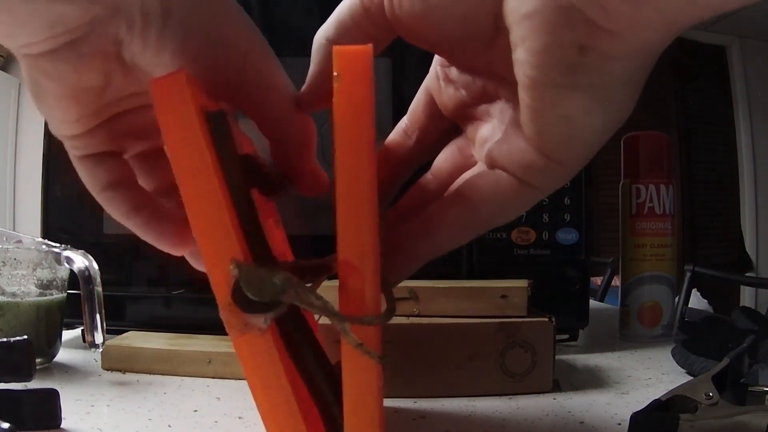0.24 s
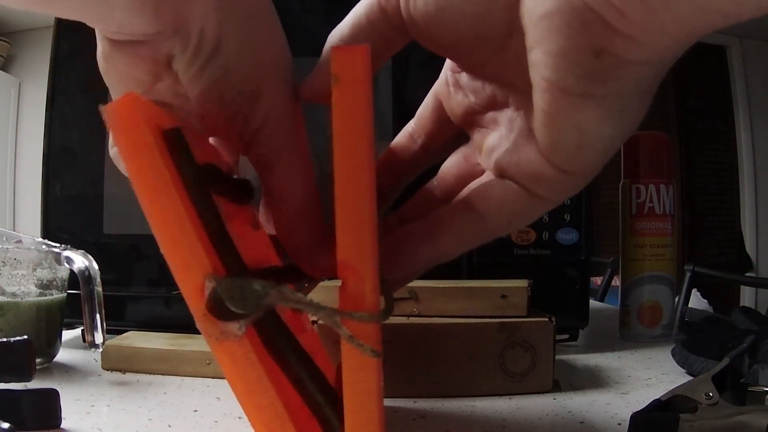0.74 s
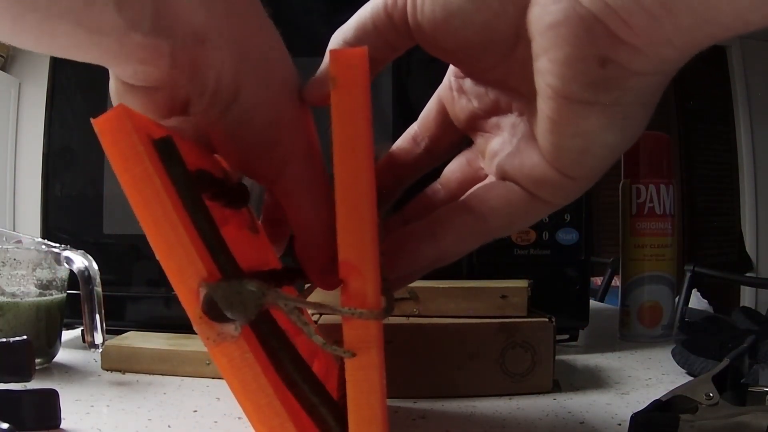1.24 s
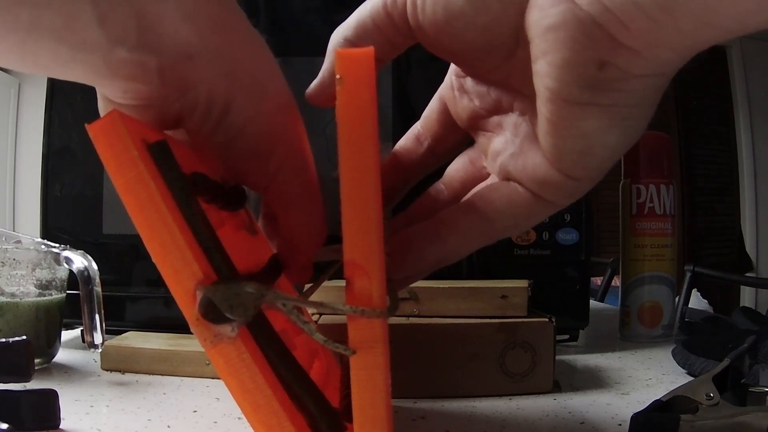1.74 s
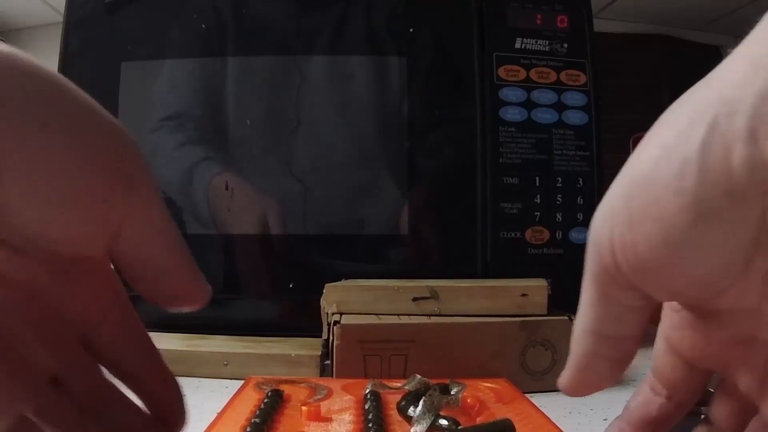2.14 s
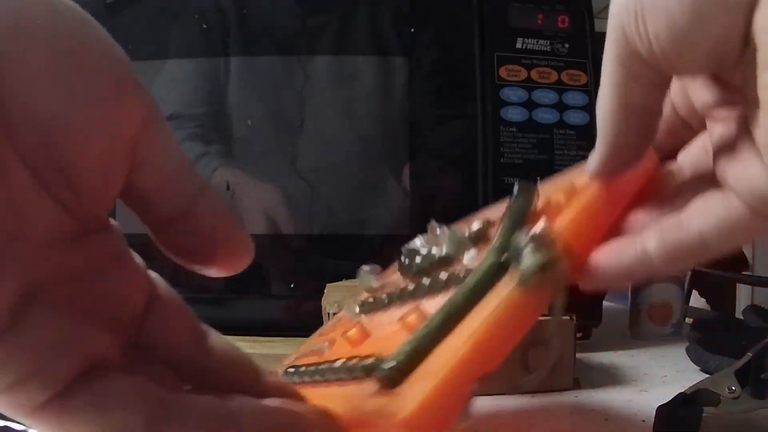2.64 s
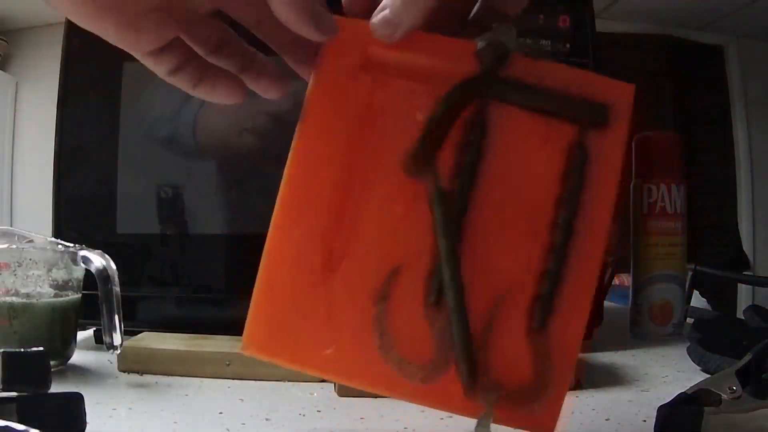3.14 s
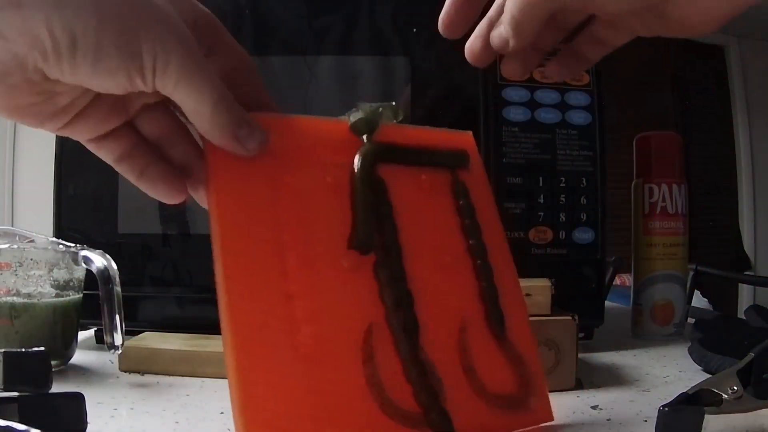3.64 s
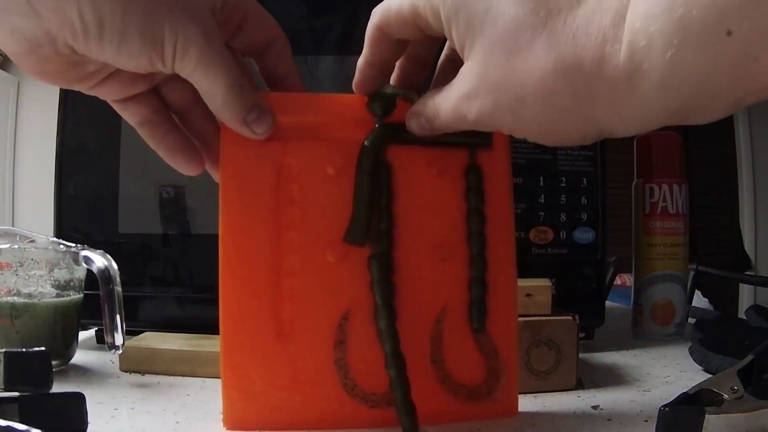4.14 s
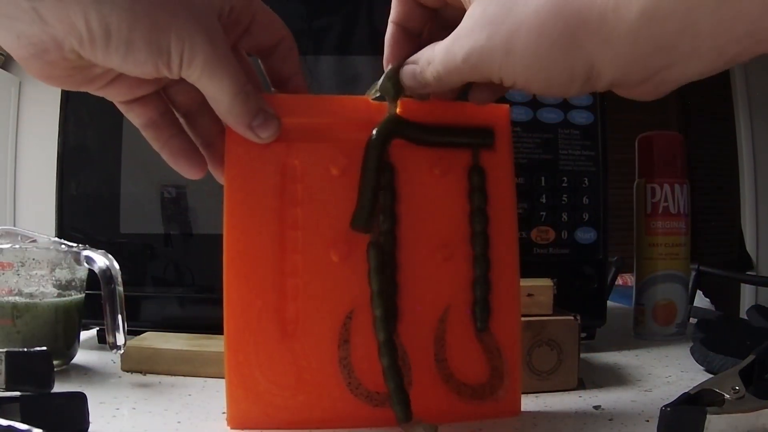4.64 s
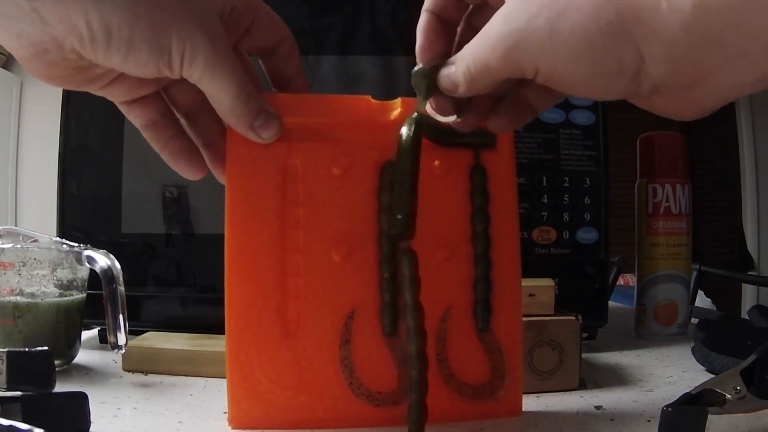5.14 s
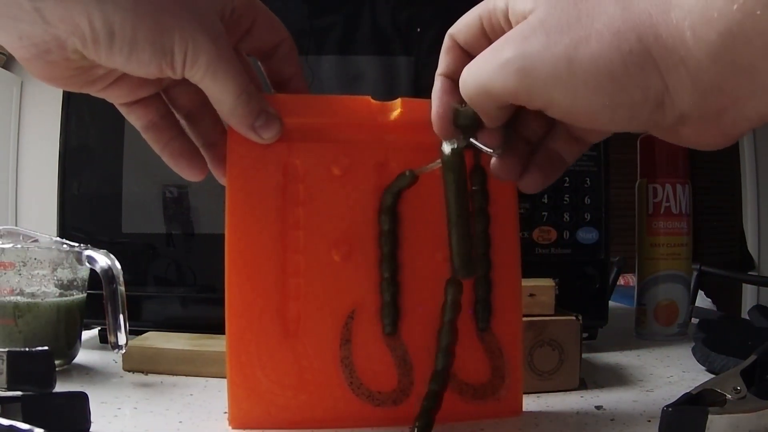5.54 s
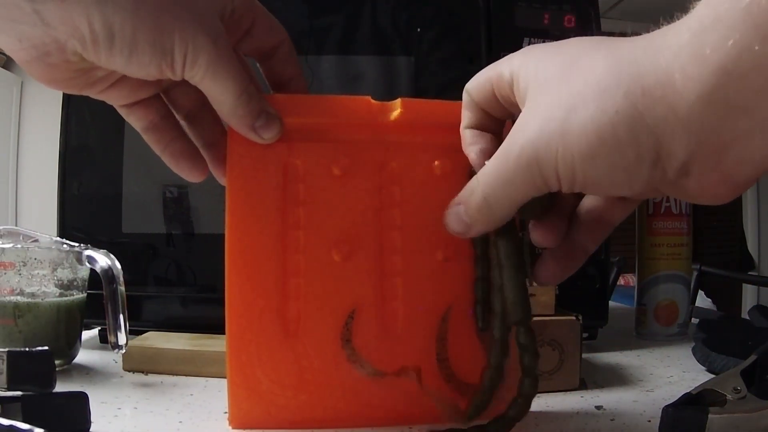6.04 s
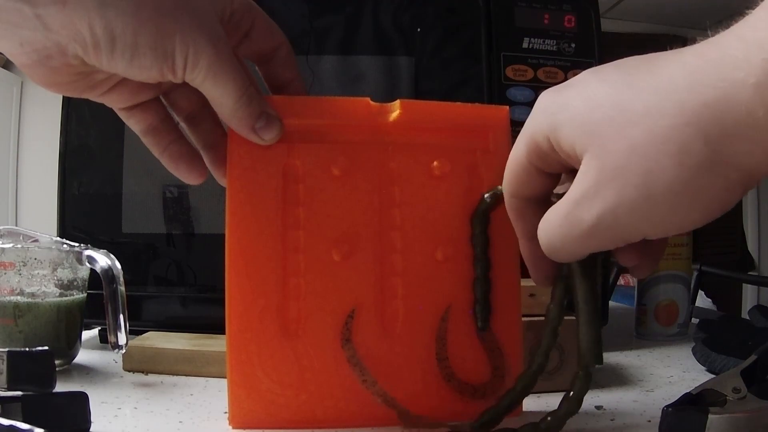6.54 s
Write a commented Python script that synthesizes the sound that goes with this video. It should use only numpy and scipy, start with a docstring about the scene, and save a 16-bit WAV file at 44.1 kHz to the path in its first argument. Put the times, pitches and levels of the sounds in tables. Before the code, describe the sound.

Close, dry-sounding kitchen handling of a stiff plastic plate. Muffled finger bumps and one solid clustered knock come first, followed by a pause with only quiet room hiss and a low appliance hum. Later the plate slides lightly, rattles and stutters against the counter in quick clacks, then gives separate snaps, skin rubs and faint sticky peeling, ending with a heavy dull thud and a firm knock.

```python
"""Two hard plastic mold halves knock and snap as they are pried apart on a kitchen counter, heard close up.
Each contact is a damped push, a noisy snap and ringing plate modes, balanced in four frequency registers.
A half stood upright scrapes and judders: random slips ring narrow resonances. Fingers rub and peel out soft
lures, and the counter rumbles low, all from shaped noise and slips. Short noise echoes form the small room,
over steady hiss and a slightly unsteady hum of sines."""
import sys
import numpy as np
from scipy import signal
from scipy.fft import rfft, irfft, next_fast_len
from scipy.io import wavfile

SR = 44100
rng = np.random.default_rng(int(sys.argv[2]) if len(sys.argv) > 2 else 0)


def generate_wav(sig):
    """Save sig (samples, or channels by samples) to the path in sys.argv[1] as 16-bit PCM at SR."""
    pcm = np.round(np.clip(np.atleast_2d(sig).T, -1, 1) * 32767).astype(np.int16)
    wavfile.write(sys.argv[1], SR, pcm)


N = 299439

# Room air and hiss, relative spectrum: (frequency [Hz], density [dB per Hz])
AIR_SPECTRUM = [(12, -59), (20, 0.5), (32, -34.5), (47, -4), (70, -2.5), (85, -7.5), (119, -2), (208, -3),
                (246, -8), (268, -8.5), (407, -10.5), (508, -15), (913, -19), (1140, -21), (15700, -29.5)]
# Hum partials, before the hum trim: (frequency [Hz], level [dB])
HUM_PARTIALS = [(59.2, -82.5), (118.4, -81.5), (242.2, -81), (597.5, -90.5), (721.4, -100.5),
                (780.6, -90.5), (899.0, -91.5), (1082, -95.5), (1319, -95)]
# Decay of the small room: (frequency [Hz], T60 [s])
ROOM_DECAY = [(100, 0.92), (350, 0.29), (1000, 0.26), (4000, 0.2), (10000, 0.24)]

# Relative noise colours of counter rumble, skin, tacky lures, gritty edge and plastic snap:
# (frequency [Hz], density [dB per Hz])
COUNTER_SPECTRUM = [(35, -11), (65, -3.5), (88, 6.5), (130, -4), (220, -19.5), (500, -53)]
SKIN_SPECTRUM = [(100, -37), (220, 1), (350, 14), (480, -3.5), (700, -22), (1500, -27), (4000, -68)]
TACK_SPECTRUM = [(600, -6), (1500, -2), (2300, -33), (3300, -9.5), (4400, -3), (5400, -5), (6800, -31),
                 (10000, -44)]
GRIT_SPECTRUM = [(70, -29), (150, -16), (350, -28), (700, -6), (1100, 8.5), (1900, 2.5), (3300, -17),
                 (5500, -10), (9000, -25), (15000, -42)]
SNAP_SPECTRUM = [(100, 2.5), (700, 8), (1300, 3.5), (1900, -4.5), (3200, -5.5), (4000, -12), (5000, -7.5),
                 (6500, -23), (8300, -29), (10000, -37), (15000, -33)]

# Resonances rung by friction, relative levels: (frequency [Hz], width [Hz], level [dB])
PEEL_RESONANCES = [(2140, 340, 3), (3360, 68, -9), (4070, 140, -4), (4390, 99, 12), (4900, 210, -4)]
SLIDE_RESONANCES = [(573, 160, 9), (990, 38, -33), (1360, 75, -24), (2530, 55, -3), (2960, 230, -8),
                    (3860, 130, -14), (5000, 65, -4.5)]
JUDDER_RESONANCES = [(397, 42, -8.5), (702, 29, 5), (1034, 39, -2.5), (1436, 59, -6), (2420, 63, -17.5),
                     (2800, 59, -14), (3520, 200, -19.5), (4500, 230, -31)]

# Strokes, levels before each layer's trim: (start [s], length [s], level [dB], change over the stroke [dB])
# Low counter rumbles, some trailing a hard knock
RUMBLE_STROKES = [(4.825, 0.042, -40, -7), (4.94, 0.18, -65, -12), (5.36, 0.14, -47.5, -8.5),
                  (6.385, 0.048, -51, -7)]
# Fingers rubbing on the plate
RUB_STROKES = [(1.14, 0.12, -59.5, 4), (1.33, 0.048, -49, -20), (2.135, 0.1, -64, -10),
               (3.28, 0.11, -54, -4), (5.31, 0.063, -62.5, 7), (5.66, 0.078, -53, -8),
               (6.44, 0.35, -61.5, -2.5)]
# Tacky lures peeling from their cavities
PEEL_STROKES = [(1.08, 0.052, -53, -22), (2.135, 0.072, -75, -9), (5.335, 0.033, -72.5, -2),
                (5.47, 0.18, -66, -7.5), (5.63, 0.07, -54.5, -9.5), (5.75, 0.173, -77, 7.5),
                (6.538, 0.021, -65, -3.5)]
# The plate sliding upright over the counter
SLIDE_STROKES = [(3.12, 0.187, -72, 9), (3.32, 0.095, -61, -4.5), (5.645, 0.14, -61, -13)]
# Its edge juddering on the counter as the lures are tugged
JUDDER_STROKES = [(4.28, 0.18, -55, 1), (4.435, 0.043, -43.5, -8), (4.505, 0.16, -48, -14),
                  (4.71, 0.043, -64, -3)]

# Plate modes, levels before register balance:
# (frequency [Hz], T60 [s], level struck at the edge [dB], level struck at a corner [dB])
PLATE_MODES = [(95.8, 0.22, -17, -7), (159.7, 0.14, -7.5, -2.5), (240.6, .17, -12.5, -15.5),
               (336, 0.15, -10.5, -2.5), (382.2, 0.1, 0.5, -3.5), (560.6, 0.087, -6, -1.5),
               (706.7, 0.09, 1.5, -11), (895, 0.054, -6.5, -18), (1105, 0.076, 4.5, -32),
               (1266, 0.065, -7, -7.5), (1523, 0.045, -35, 12.5), (1930, 0.15, -15, -20.5),
               (2230, 0.051, -3.5, -26), (2523, 0.053, -36, -6.5), (2793, 0.044, -22, -29),
               (3086, 0.022, -5, -28), (3300, 0.028, -16, -17), (4780, 0.031, -15, -14),
               (5160, 0.015, -27, -16), (8080, 0.017, -31, -9.5)]
# What the small plate can radiate: (frequency [Hz], gain [dB])
RADIATION_GAIN = [(20, -30), (45, -12), (75, -7), (120, -1), (9000, -2), (11000, -8), (15000, -11)]
# Soft, slowly swelling bumps: fingertips, or the lead-in and after-knock of a dull knock.
# Before radiation: (time [s], push pitch [Hz], level [dB])
SOFT_BUMPS = [(0.456, 246, -59.5), (0.472, 342, -58), (0.542, 302, -57), (0.59, 300, -49),
              (0.612, 350, -50.5), (1.058, 333, -40), (1.069, 340, -32.5), (1.081, 407, -33),
              (1.252, 363, -51.5), (1.331, 323, -46), (6.363, 256, -58.5), (6.389, 338, -39)]
# Plastic knocking on plastic or on the counter, before radiation: (time [s], push pitch [Hz], level [dB],
# hardness [0-1], grip of the hand [0-1], place on the plate [0 edge - 1 corner])
PLASTIC_KNOCKS = [(0.623, 345, -44, 0.31, 1, 0.15), (1.066, 335, -41.5, 0.55, 0.63, 0.67),
                  (1.0764, 255, -34, 0.45, 0.82, 0.56), (1.096, 253, -36.5, .25, 0.49, .15),
                  (2.133, 383, -61.5, 0.6, 1, 0.89), (3.2, 510, -61, 0.43, 0.56, .2),
                  (3.318, 410, -57, 0.64, .95, 0.37), (3.371, 305, -57, 0.5, 1, 0.87),
                  (3.409, 474, -56.5, .4, .5, 0.58), (4.028, 485, -39.5, 0.99, .75, 0.0091),
                  (4.05, 320, -42.5, 0.79, 0.74, 0.68), (4.228, 392, -51.5, 0.81, .6, 0.23),
                  (4.241, 290, -37, 0.75, 0.96, 0.14), (4.27, 374, -45, 0.63, 0.77, 0.34),
                  (4.347, 297, -34, 0.33, 0.44, 0.45), (4.364, 333, -40.5, 0.12, .8, 0.95),
                  (4.398, 368, -47, 0.52, 0.11, 0.11), (4.431, 507, -39, .52, 0.7, 0.99),
                  (4.4372, 525, -32, 0.2, 0.05, 0.49), (4.476, 403, -55, 0.63, 0.6, 0.56),
                  (4.501, 600, -51.5, 0.72, 0.26, 0.4), (4.54, 620, -53, 0.57, 0.02, .1),
                  (4.562, 635, -58, 0.64, .3, .6), (4.8017, 296, -40, 0.75, 0.87, 0.76),
                  (4.8049, 346, -36.5, .9, 0.74, 0.93), (5.266, 320, -58.5, 0.48, 0.84, .32),
                  (5.621, 510, -36.5, 0.58, 1, 0.2), (5.705, 418, -57, .75, 1, 0.67),
                  (6.376, 292, -29, .06, 0.88, 0.31), (6.537, 251, -53.5, 0.46, .98, 0.28),
                  (6.622, 236, -50, 0.18, .6, 0.23), (6.758, 524, -26, .38, 0.68, .1)]

STROKE_ATTACK_S, STROKE_RELEASE_S = 0.033, 0.023  # fades outside each stroke's start and end
UNEVEN_DB, UNEVEN_PER_S = 3, 45  # depth and rate of the wavering pressure

# The push peaks after this many cycles: within one for a knock, later for a soft bump
KNOCK_SWELL_CYCLES, BUMP_SWELL_CYCLES = 0.89, 2.34
BUMP_HARDNESS, BUMP_GRIP, BUMP_PLACE = 0.008, 0.99, 0.076  # soft, damped, near the edge
REBOUND_ABOVE_DB = -45.0  # only louder knocks land once more
REBOUND_S, REBOUND_SCATTER = 0.0125, 0.1034  # typical delay, relative spread
REBOUND_DB, REBOUND_HARDNESS = -9, 0.63  # level change, share of the hardness left

# Register levels against the contact's level
THUMP_DB, THUMP_HZ = -3.5, 238.5  # thump of an edge push at this pitch
THUMP_DB_PER_OCTAVE, THUMP_CORNER_DB = -14, 13.5  # quicker pushes thump less, corners more
RING_DB, RING_HARD_DB, RING_GRIP_DB = -10.5, 29, -18.5  # soft and free; full hardness adds; full grip adds
CRACK_DB, CRACK_HARD_DB = -42.5, 45.5  # soft; full hardness adds


def amp(db):
    """Decibels to gain."""
    return 10 ** (np.asarray(db) / 20)


def unit(x):
    """x at rms 1."""
    return x / np.sqrt(np.mean(x ** 2) + 1e-20)


def along(points, hz):
    """(Hz, value) points read on a log frequency axis."""
    f, v = np.transpose(points)
    return np.interp(np.log(hz + 1), np.log(f + 1), v)


def colour(x, spectrum):
    """x shaped by (Hz, dB) points with zero phase."""
    size = next_fast_len(len(x) + 8192)
    gain = amp(along(spectrum, np.fft.rfftfreq(size, 1 / SR)))
    return irfft(rfft(x, size) * gain, size)[:len(x)]


def causal(x, spectrum):
    """x shaped by (Hz, dB) points with minimum phase, so nothing sounds ahead of the attack."""
    size = 2 * next_fast_len(len(x))
    log_gain = np.log(amp(along(spectrum, np.fft.rfftfreq(size, 1 / SR))))
    cepstrum = irfft(log_gain, size)
    cepstrum[1:size // 2] *= 2
    cepstrum[size // 2 + 1:] = 0
    return irfft(rfft(x, size) * np.exp(rfft(cepstrum)), size)[:len(x)]


def strokes(rows):
    """Gain over time: each stroke takes hold, swells or fades evenly in dB and lets go, under wavering pressure."""
    t = np.arange(N) / SR
    gain = np.zeros(N)
    for start, length, db, change_db in rows:
        edges = [start - STROKE_ATTACK_S, start, start + length, start + length + STROKE_RELEASE_S]
        span = slice(*np.searchsorted(t, [edges[0], edges[-1]]))
        hold = np.interp(t[span], edges, [0, 1, 1, 0]) ** 2
        progress = np.clip((t[span] - start) / length, 0, 1)
        gain[span] = np.maximum(gain[span], hold * amp(db + change_db * progress))
    knots = rng.standard_normal(size=1000)
    waver = np.interp(t * UNEVEN_PER_S, np.arange(len(knots)), knots)
    return gain * amp(UNEVEN_DB * waver)


def slips(per_s, spread_db, smooth):
    """Friction force: tiny slips of uneven size at random moments, on a smooth hiss."""
    moments = rng.random(N) < per_s / SR
    grains = moments * rng.choice([-1, 1], N) * amp(spread_db * rng.standard_normal(N))
    return unit(unit(grains) + smooth * rng.standard_normal(N))


def friction(force, resonances, spectrum, broad_db):
    """Slips ring a few resonances and add a broad hiss of their own."""
    size = next_fast_len(N)
    f = np.fft.rfftfreq(size, 1 / SR)
    body = np.zeros(len(f), complex)
    for k, (hz, width, db) in enumerate(resonances):
        sign = (-1) ** k  # neighbouring resonances in opposite phase
        body += sign * amp(db) * 1j * f * width / (hz ** 2 - f ** 2 + 1j * f * width)
    ring = irfft(rfft(force, size) * body, size)[:N]
    hiss = unit(colour(force, spectrum))
    return unit(unit(ring) + amp(broad_db) * hiss)


def air(level_db):
    """Room air and microphone hiss: steady noise of a fixed colour."""
    return amp(level_db) * unit(colour(rng.standard_normal(N), AIR_SPECTRUM))


def appliance_hum(trim_db, waver_rad):
    """An appliance's hum: sine partials whose phases drift slowly and separately."""
    t = np.arange(N) / SR
    hum = np.zeros(N)
    for hz, db in HUM_PARTIALS:
        drift = np.interp(t, np.linspace(0, t[-1], num=30), rng.standard_normal(size=30))
        hum += amp(db) * np.sqrt(2) * np.sin(2 * np.pi * hz * t + waver_rad * drift)
    return amp(trim_db) * hum


def kitchen(x, wet_db, near_db, near_t60, gap_s):
    """Appliances close by throw back a dense early answer; the room tail's decay depends on frequency."""
    out = np.zeros(N + 2 * SR)
    block = SR // 4
    for start in range(0, N, block):  # fresh echo paths every quarter second
        hz, t, z = signal.stft(rng.standard_normal(SR // 2), SR, nperseg=256)
        decay = amp(-60 * t / along(ROOM_DECAY, hz)[:, None])
        tail = signal.istft(z * decay, SR, nperseg=256)[1]
        near_decay = amp(-60 * np.arange(len(tail)) / SR / near_t60)
        near = rng.standard_normal(len(tail)) * near_decay
        answer = amp(wet_db) * tail / np.linalg.norm(tail) + amp(near_db) * near / np.linalg.norm(near)
        wet = signal.fftconvolve(x[start:start + block], answer)
        out[start + round(gap_s * SR):][:len(wet)] += wet
    return out[:N]


def counter_rumble(trim_db):
    """The counter rumbles: noise with a low colour, swelling and fading in strokes."""
    return amp(trim_db) * strokes(RUMBLE_STROKES) * unit(colour(rng.standard_normal(N), COUNTER_SPECTRUM))


def finger_rub(trim_db):
    """Skin stutters dully over the plate: sparse slips through a low colour."""
    force = slips(per_s=230, spread_db=1.5, smooth=0.97)
    return amp(trim_db) * strokes(RUB_STROKES) * unit(colour(force, SKIN_SPECTRUM))


def lure_peel(trim_db):
    """Lures let go with a fine crackle: dense uneven slips ring high resonances."""
    force = slips(per_s=1100, spread_db=5.5, smooth=0.53)
    crackle = friction(force, PEEL_RESONANCES, TACK_SPECTRUM, broad_db=-1.5)
    return amp(trim_db) * strokes(PEEL_STROKES) * crackle


def edge_slide():
    """The sliding edge catches and slips finely on the counter: dense, even slips."""
    force = slips(per_s=1400, spread_db=1.5, smooth=0.57)
    return strokes(SLIDE_STROKES) * friction(force, SLIDE_RESONANCES, GRIT_SPECTRUM, broad_db=-12.5)


def edge_judder(trim_db):
    """The tugged edge catches and slips coarsely: sparser, uneven slips."""
    force = slips(per_s=700, spread_db=6.5, smooth=0.71)
    scrape = friction(force, JUDDER_RESONANCES, GRIT_SPECTRUM, broad_db=-8.5)
    return amp(trim_db) * strokes(JUDDER_STROKES) * scrape


def plate(t, place, rise_s):
    """The plate's modes as decaying sines; where it is struck decides which ones speak."""
    hz, t60, edge_db, corner_db = np.transpose(PLATE_MODES)[:, :, None]
    place = np.clip(place, 0, 1)
    scatter_db = 2 * rng.standard_normal(hz.shape)
    level_db = (1 - place) * edge_db + place * corner_db + scatter_db
    sign = rng.choice([-1, 1], hz.shape)
    modes = sign * amp(level_db - 60 * t / t60) * np.sin(2 * np.pi * hz * t)
    return (1 - np.exp(-t / rise_s)) * np.sum(modes, axis=0)


def touch(s, hz, db, hardness, grip, place, cycles):
    """Register levels of one contact: slow pushes thump, hard ones ring and crack, a firm grip mutes the ring."""
    hardness, grip, place = np.clip([hardness, grip, place], 0, 1)
    thump_db = db + THUMP_DB + THUMP_DB_PER_OCTAVE * np.log2(hz / THUMP_HZ) + THUMP_CORNER_DB * place
    knock_db = db
    ring_db = db + RING_DB + RING_HARD_DB * hardness + RING_GRIP_DB * grip
    crack_db = db + CRACK_DB + CRACK_HARD_DB * hardness
    return s, hz, cycles, thump_db, knock_db, ring_db, crack_db, place


def touches():
    """All contacts: soft bumps and light knocks land once, stronger knocks rebound more softly."""
    rows = []
    for s, hz, db in SOFT_BUMPS:
        rows.append(touch(s, hz, db, BUMP_HARDNESS, BUMP_GRIP, BUMP_PLACE, BUMP_SWELL_CYCLES))
    for s, hz, db, hardness, grip, place in PLASTIC_KNOCKS:
        rows.append(touch(s, hz, db, hardness, grip, place, KNOCK_SWELL_CYCLES))
        if db > REBOUND_ABOVE_DB:
            flight_s = REBOUND_S * np.exp(REBOUND_SCATTER * rng.standard_normal())
            softer = hardness * REBOUND_HARDNESS
            rows.append(touch(s + flight_s, hz, db + REBOUND_DB, softer, grip, place, KNOCK_SWELL_CYCLES))
    return rows


def contacts(push_db, snap_db, snap_t60, chatter_db, chatter_t60):
    """Each contact is a damped push, a snap and the plate's ring, balanced in four registers."""
    registers = [(60, 220), (220, 620), (620, 2000), (2000, 14000)]  # thump, knock, ring, crack [Hz]
    plateaus = [(60, 160), (270, 480), (1050, 1500), (2400, 14000)]  # flat part of each register's gain [Hz]
    attack_s = 0.013
    t = np.arange(next_fast_len(SR // 6)) / SR
    f = np.fft.rfftfreq(len(t), 1 / SR)
    weight = 0.3 + 0.7 * np.exp(-(t / attack_s) ** 4)  # levels count mostly the attack
    fade = np.cos(np.pi / 2 * (t / t[-1]) ** 2)  # smoothly ends each contact's last ringing
    out = np.zeros(N + SR)
    for s, hz, cycles, *levels_db, place in touches():
        u = hz * t / cycles
        swell = (u * np.exp(1 - u)) ** 3  # a soft bump swells slowly, a knock quickly
        push = amp(push_db) * swell * np.sin(2 * np.pi * hz * t)
        # a quick snap, then a longer chatter standing for dense short modes
        decay = amp(snap_db - 60 * t / snap_t60) + amp(chatter_db - 60 * t / chatter_t60)
        noise = unit(colour(rng.standard_normal(len(t)), SNAP_SPECTRUM))
        snap = decay * (1 - np.exp(-t / 0.00023)) * noise
        blow = push + plate(t, place, rise_s=0.00068) + snap
        for headroom_db in (5, 0):  # two passes bring the registers towards their levels
            power = 2 * np.abs(rfft(blow * weight)) ** 2 / (len(t) * attack_s * SR)
            gains_db = []
            for db, (lo, hi) in zip(levels_db, registers):
                gains_db.append(db - 10 * np.log10(power[(f >= lo) & (f < hi)].sum()))
            # the thump's gain is capped relative to the knock's
            gains_db[0] = min(gains_db[0], gains_db[1] + headroom_db)
            curve = [(edge, db) for db, edges in zip(gains_db, plateaus) for edge in edges]
            blow = causal(blow, curve)
        out[round(s * SR):][:len(t)] += blow * fade
    return out[:N]


def scene():
    """The mold, the fingers and the counter in the kitchen."""
    background = air(level_db=-69) + appliance_hum(trim_db=2.0, waver_rad=0.21)
    rumble = counter_rumble(trim_db=-5.5)
    fingers = finger_rub(trim_db=-2.5) + lure_peel(trim_db=-2.5)
    scrapes = edge_slide() + edge_judder(trim_db=-2.5)
    knocks = contacts(push_db=10.5, snap_db=4, snap_t60=0.021, chatter_db=-2.0, chatter_t60=0.058)
    mold = causal(knocks, RADIATION_GAIN) + scrapes + fingers + rumble
    room = kitchen(mold, wet_db=-15.5, near_db=-14.5, near_t60=0.087, gap_s=0.011)
    return (mold + room + background)[None]


def record(dry):
    """A steep low-pass keeps nothing above the band limit."""
    top_hz = 15780
    size = next_fast_len(N + 8192)
    passed = np.fft.rfftfreq(size, 1 / SR) < top_hz
    return irfft(rfft(dry, size) * passed, size)[:, :N]


dry = scene()
out = record(dry)
generate_wav(out)
```